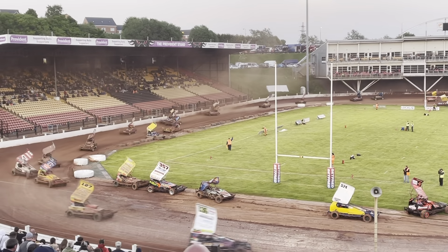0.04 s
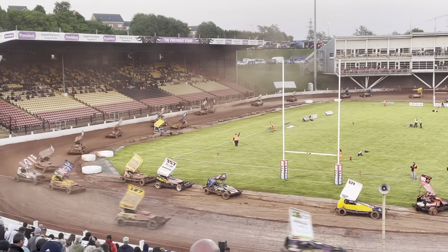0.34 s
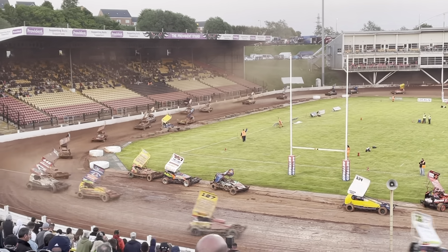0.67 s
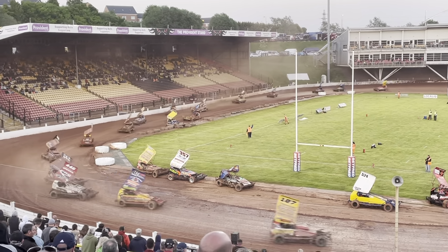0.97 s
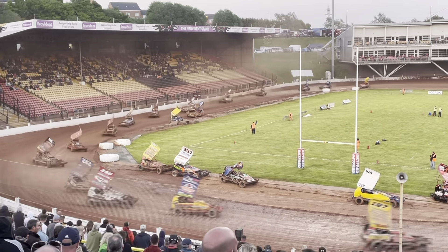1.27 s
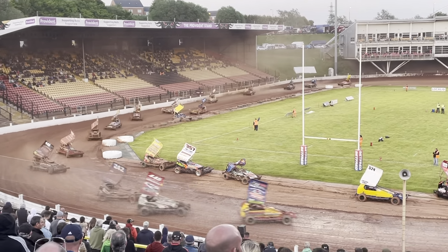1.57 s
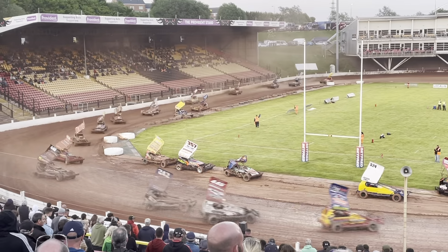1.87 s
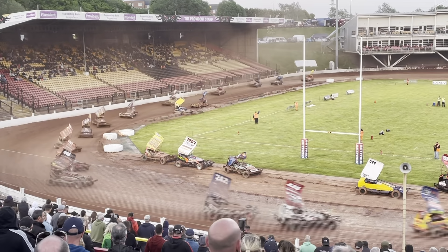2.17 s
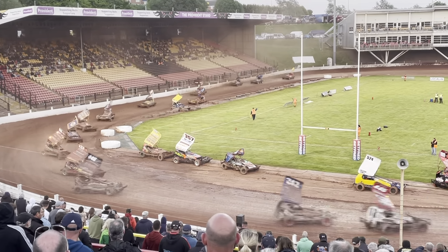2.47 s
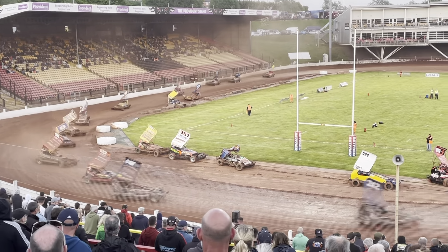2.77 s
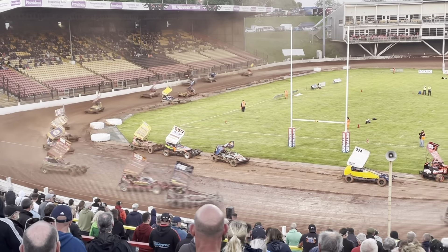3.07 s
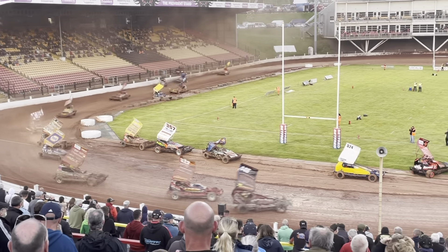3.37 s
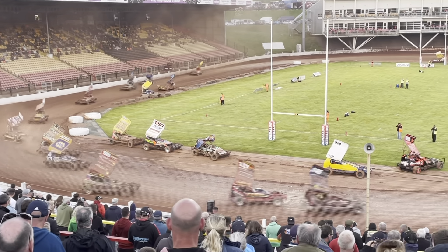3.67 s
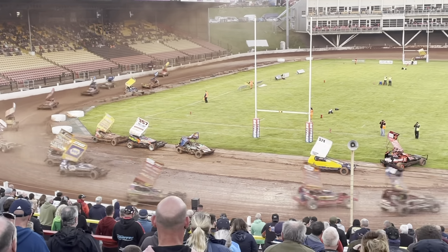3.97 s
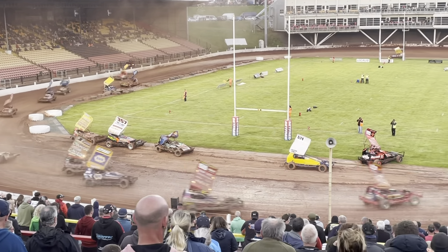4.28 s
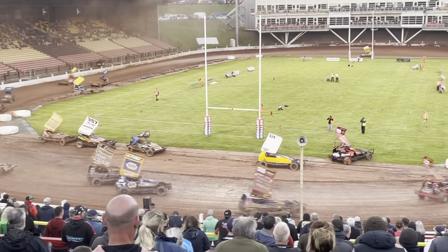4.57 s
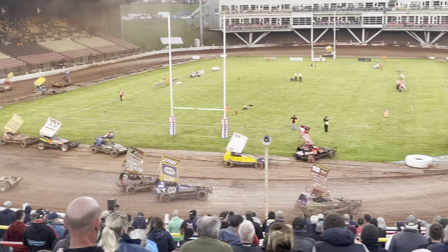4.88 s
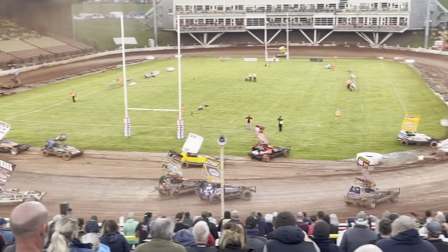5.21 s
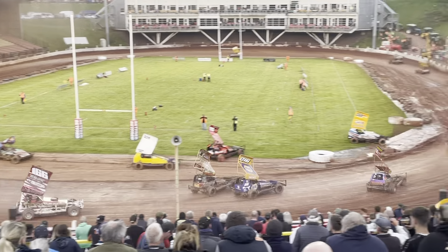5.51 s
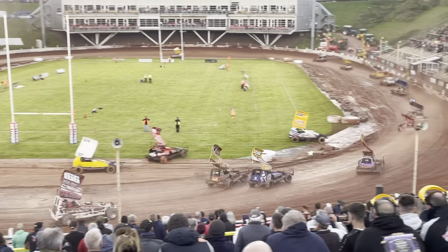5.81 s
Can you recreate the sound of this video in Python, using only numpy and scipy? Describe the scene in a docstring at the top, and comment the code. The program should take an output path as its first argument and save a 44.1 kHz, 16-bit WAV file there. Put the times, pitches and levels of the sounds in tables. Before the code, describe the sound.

A field of open-piped V8 stock cars races on a dirt oval, heard from high in a stadium's stands. Their rumbling, rasping roar lasts all six seconds, echoes off the terraces and grows somewhat louder from about 2 seconds. At first a near engine booms with a deep, lumpy throb, barking harder around 1.7 seconds. Another revs up sharply at 2.2 seconds and again near 2.8. More cars accelerate past, overlapping, from 3.3 to 5.2 seconds, and a last one barks around 5.6 and at the end. Farther engines rise and fall in pitch behind them. Faint tyre scrapes and thin squeals come in the first 1.3 seconds and again near 5.3. Flung grit hisses lightly, with small, bright stone cracks around 0.8 to 1.6 seconds and 5.3. One soft, low gust buffets the microphone at about 5.4 seconds.

```python
"""A dirt oval, high in the stands: open-piped V8 stock cars power out of a bend.
Each engine's unevenly firing banks bark through the exhaust and boom when the revs meet the pipe's
resonance; a few near cars stand out of the pack. Gas rasps at every firing, tyres scrape and fling
grit, one gust buffets the microphone, and the stadium throws the sound back."""
import sys
import numpy as np
from scipy import signal
from scipy.fft import rfft, irfft
from scipy.io import wavfile
from scipy.ndimage import map_coordinates

SR = 44100
rng = np.random.default_rng(int(sys.argv[2]) if len(sys.argv) > 2 else 0)


def file_out(sig):
    """Save sig as 16-bit WAV at sys.argv[1]."""
    # one column per channel
    cols = np.atleast_2d(sig).T
    # limit, then scale
    lim = np.clip(cols, -1, 1)
    pcm = np.round(lim * 32767).astype(np.int16)
    wavfile.write(sys.argv[1], SR, pcm)


N = 266805
T = np.arange(N) / SR

# spectrum of flung shale (frequency [Hz], gain [dB])
SHALE_SPECTRUM = [(3000, 1), (7000, 3), (10000, 15.5), (11500, 2.5), (13000, 9.5), (14300, -4),
                  (15500, -30)]


def near_cars(fade_s=.082, wheelspin=.005, flutter_db=1.5, waver_db=-.7, wet_db=-11):
    """Exhausts boom near cycle harmonic 3, growl near 5, bark at the firing rate and blare above."""
    # one curve per engine line (time [s], engine cycle rate [Hz], bark level [dB])
    opening_line = [(0, 34, -31), (.17, 31.6, -31), (.3, 33.5, -31), (.5, 37.7, -35), (.68, 35.5, -25.5),
                    (.8, 35.3, -26.5), (.95, 35.4, -33), (1.15, 32.8, -31), (1.3, 32.2, -30.5),
                    (1.44, 33.9, -25), (1.56, 33.7, -31), (1.7, 35.2, -19), (1.77, 34.7, -26),
                    (1.83, 36.9, -20.5), (1.92, 36.5, -24.5), (2.02, 38.4, -23), (2.12, 39.5, -38),
                    (2.55, 38, -37), (2.92, 38.3, -34), (3.12, 40.4, -32), (3.3, 37, -42)]
    line_b = [(2.1, 33, -20), (2.15, 34, -17.5), (2.21, 36.4, -13.8), (2.26, 39, -14), (2.31, 40.8, -19.5),
              (2.38, 41, -34), (2.6, 42, -26), (2.78, 44.7, -20), (2.88, 44.5, -30), (3.05, 46, -38)]
    line_c = [(2.8, 27.01, -42), (3.3, 31.55, -31), (3.5, 36, -37), (3.66, 35.7, -27), (3.85, 41, -28),
              (3.97, 43.6, -24.5), (4.07, 43, -24), (4.17, 43, -31), (4.27, 44.2, -22), (4.4, 43.5, -42),
              (4.52, 42, -21), (4.67, 44.4, -24), (4.73, 43.2, -25), (4.82, 42.56, -18),
              (4.93, 43.52, -23.5), (5.05, 45.37, -20), (5.2, 45.3, -28.5), (5.5, 45.98, -35)]
    line_d = [(3.35, 42.96, -29), (3.45, 43.52, -18.5), (3.6, 45.5, -25.5), (3.8, 49.37, -25),
              (3.95, 49.13, -32), (4.15, 46, -44), (4.5, 47, -26.5)]
    line_e = [(4.1, 29.98, -25), (4.27, 28.67, -27.5), (4.88, 30, -33), (5.2, 32.55, -26.5),
              (5.45, 34.46, -37), (5.57, 36.17, -20), (5.68, 35.43, -29), (5.85, 33.5, -33),
              (6.05, 36.07, -21.5)]
    # (curve, boom at resonance [dB], throb [dB], growl [dB], far bank in the bark [dB], blare [dB])
    exhausts = [(opening_line, -16.5, 1, -26, -9.5, -39.5),
                (line_b, -22.5, 3.9, -37, -2, -34.5),
                (line_c, -21.5, 3.2, -36, -4.5, -36.5),
                (line_d, -28, 3, -37, -6, -34.5),
                (line_e, -25.5, 4.35, -32, -8, -40)]
    # (frequency [Hz], gain [dB])
    boom_spectrum = [(30, -50), (60, -22), (85, 0), (125, 0), (160, -20), (250, -42), (500, -60),
                     (4000, -110)]
    growl_spectrum = [(60, -34), (110, -35), (150, 5), (235, 0.5), (280, -12.5), (400, -46.5), (800, -73),
                      (4000, -100)]
    bark_spectrum = [(100, -55.5), (190, -12), (260, 6), (370, 2.5), (450, 4), (620, -18.5), (1200, -22),
                     (2500, -24), (6000, -48.5), (12000, -84)]
    blare_spectrum = [(250, -35.5), (480, -7.5), (750, 2), (1300, -7.5), (2400, -10.5), (3500, -17),
                      (6000, -39.5)]
    # a pipe swings towards the stand and rings
    # (time [s], half length [s], frequency [Hz], width [Hz], glide [octaves/s], level [dB])
    flares = [(0.442, .08, 1240, 600, 0, -36.5), (.545, 0.014, 1690, 1400, 0, -37),
              (0.879, 0.14, 1960, 520, .7, -35.5), (1.282, .07, 1880, 260, 0.35, -38.5),
              (1.197, 0.1, 946, 90, -0.115, -33.5), (1.199, 0.2, 640, 140, 0, -31),
              (1.697, 0.023, 3000, 500, -0.1, -40), (2.223, 0.046, 1300, 1400, -0.1, -38),
              (2.734, 0.083, 753.4, 300, 0.28, -30), (3.097, 0.05, 820.4, 130, -0, -30.5),
              (3.117, .09, 505, 120, -0.11, -23), (3.808, 0.18, 444, 90, 0.09, -21.5),
              (3.914, 0.14, 850, 130, 0.35, -26.5), (4.012, 0.099, 2310, 350, 0.17, -36),
              (4.101, 0.18, 2995, 1100, 0.4, -39), (4.126, 0.049, 1600, 300, -0.13, -34),
              (4.143, 0.057, 518, 130, 0, -29), (4.33, 0.058, 1150, 600, .2, -35),
              (5.28, 0.036, 2000, 2400, 0, -36.5)]
    # the opening boom of several passing cars dips briefly between them (time [s])
    dips = [.67, 1.15, 1.62, 3.05]
    dip_db = -27 * sum(swell(at_s, half_s=.028) for at_s in dips)
    booms = barks = blares = drive = 0
    for line, boom_db, throb_db, growl_db, far_bank_db, blare_db in exhausts:
        cycle_hz, bark_db = curves(line)
        present = np.clip(np.minimum(T - line[0][0], line[-1][0] - T) / fade_s + 1, 0, 1)
        revs_hz = cycle_hz * (1 + wheelspin * walk(14))
        lumps = firings(revs_hz, far_bank_db=-24.5, scatter_db=1.3, jitter_s=.00005)
        pulses = firings(revs_hz, far_bank_db, scatter_db=1.3, jitter_s=.00005)
        lumps, pulses = lumps - lumps.mean(), pulses - pulses.mean()
        boom = band(lumps, boom_spectrum, boom_db + throb_db * walk(14)) * boom_gain(cycle_hz)
        growl = band(lumps, growl_spectrum, growl_db + waver_db * walk(6.9))
        bark = band(pulses, bark_spectrum, bark_db + flutter_db * walk(30))
        booms += present * boom * (amp(dip_db) if line is opening_line else 1)
        barks += present * (growl + bark)
        blares += present * band(lumps, blare_spectrum, blare_db)
        drive += present * lumps
    upper = barks + blares + sum(ring(drive, *flare) for flare in flares)
    return booms + upper + amp(wet_db) * echoes(upper, t60_s=2.4, gap_s=.055)


def firings(cycle_hz, far_bank_db, scatter_db, jitter_s, cylinder_db=1.85, count=4096):
    """Eight exhaust pulses a cycle; the far bank is shaded, so the beat is lumpy."""
    near_bank = np.array([1, 0, 0, 1, 0, 1, 1, 0])  # cross-plane V8: 1 leaves by the near pipe
    firing = np.arange(count)
    timing, strength = np.clip(rng.standard_normal((count, 2)), -1.5, 1.5).T
    pattern_db = far_bank_db * (1 - near_bank) + cylinder_db * rng.standard_normal(8)
    fired = np.cumsum(cycle_hz) * 8 / SR + rng.random()
    at_sample = np.interp(firing, fired, np.arange(N), left=-N, right=2 * N) + jitter_s * SR * timing
    push = amp(pattern_db[firing % 8] + scatter_db * strength)
    live = (at_sample >= 0) & (at_sample < N - 1)
    index, fraction, push = at_sample[live].astype(int), at_sample[live] % 1, push[live]
    return np.bincount(index, push * (1 - fraction), N) + np.bincount(index + 1, push * fraction, N)


def boom_gain(cycle_hz, peak_cycle_hz=34.4, width_hz=9.5):
    """The boom is strongest when the revs sit on the pipe's resonance."""
    return 1 / (1 + (2 * (cycle_hz - peak_cycle_hz) / width_hz) ** 2)


def pack(puff_s=.0016, wash_db=-1):
    """The field's exhaust pulses rumble, drone and roar; gas puffs after each; the bowl smears them."""
    # before trim (time [s], rumble [dB], drone [dB], roar [dB])
    exhaust_levels = [(0.02, -30, -22.5, -24.5), (.6, -27, -20.5, -23), (0.95, -30, -22, -23.5),
                      (1.5, -27.5, -22.5, -22), (1.9, -26, -21, -17.5), (2.25, -26, -21.5, -19),
                      (2.59, -26.5, -18.5, -17.5), (3.1, -26.5, -25.5, -18.5), (3.75, -22.5, -21.5, -17.5),
                      (4.13, -23.5, -22, -18), (4.33, -21, -19.5, -19), (4.41, -23.5, -17.5, -16.5),
                      (4.92, -20.5, -20.5, -18.5), (5.39, -31, -19.5, -18), (5.7, -23.5, -18.5, -18.5),
                      (5.9, -32, -20, -17.5)]
    # gas and tyres, before trim (time [s], rasp [dB], hiss [dB])
    gas_levels = [(0.02, -23.5, -36), (0.12, -25.5, -45.5), (.3, -28, -38.5), (0.53, -25, -40.5),
                  (0.67, -31, -42), (1.15, -26, -39.5), (1.45, -29.5, -42), (1.62, -26, -40),
                  (1.98, -27.5, -40), (2.17, -27.5, -39), (3.65, -26.5, -39), (3.92, -25.5, -40),
                  (4.18, -27, -37.5), (5.03, -31, -40), (5.2, -25, -37.5), (5.23, -24.5, -37),
                  (5.32, -24.5, -37), (5.43, -32.5, -40.5), (5.65, -25, -41.5), (5.92, -28, -40.5),
                  (6.0, -26, -37)]
    # (frequency [Hz], gain [dB])
    rumble_spectrum = [(20, -46), (45, -11), (58, 4), (75, 9.5), (95, 12.5), (125, 1), (170, -20.5),
                       (300, -62.5), (3000, -100)]
    drone_spectrum = [(60, -52), (120, -7), (170, 4.5), (235, 3.5), (290, -4.5), (400, -46.5),
                      (1000, -65.5)]
    roar_spectrum = [(120, -27), (200, -20), (270, 0), (340, 3.5), (460, -0.5), (620, -10), (850, -12.5),
                     (1400, -21), (2500, -27.5), (6000, -52), (12000, -93)]
    rasp_spectrum = [(300, -3.5), (750, 3), (1000, 1), (1400, 0.5), (2000, -5.5), (3000, -14.5),
                     (6000, -35.5)]
    hiss_spectrum = [(1000, -7.5), (2200, -1), (3200, -1.5), (4500, -7.5), (5500, -9.5), (6700, -12.5),
                     (8000, -9), (9500, -38), (11000, -20), (15000, -36)]
    rumble_db, drone_db, roar_db = curves(exhaust_levels)
    rasp_db, hiss_db = curves(gas_levels)
    pulses = pack_firings()
    gas = unit(signal.lfilter([1], [1, -np.exp(-1 / (puff_s * SR))], np.abs(pulses)))
    puffs = np.hypot(gas, amp(wash_db)) * rng.standard_normal(N)  # over an even wash of reflections
    smeared = pulses + echoes(pulses, t60_s=1.88, gap_s=.02)
    rumble = band(smeared, rumble_spectrum, rumble_db, trim_db=5)
    drone = band(smeared, drone_spectrum, drone_db, trim_db=-1)
    roar = band(smeared, roar_spectrum, roar_db, trim_db=-1)
    rasp = band(puffs, rasp_spectrum, rasp_db, trim_db=-1.5)
    hiss = band(puffs, hiss_spectrum, hiss_db + .5 * walk(35), trim_db=3)
    return rumble + drone + roar + rasp + hiss


def pack_firings(cars=30, base_cycle_hz=37, pickup_per_s=.14, swing=.06, half_s=1.0, low_cut_hz=35):
    """One car after another swings out of the bend, gaining revs while it is heard."""
    gearing = np.resize([.78, 1.1, .92, 1.22, 1, .85, 1.16], cars)
    pulses = 0
    for pass_s, gear in zip(np.linspace(-1, T[-1] + 1, cars), gearing):
        age_s = T - pass_s
        cycle_hz = base_cycle_hz * gear * np.exp(pickup_per_s * np.clip(age_s, -2, 2) + swing * walk(4))
        present = np.exp(-.5 * (age_s / half_s) ** 2)
        pulses += present * firings(cycle_hz, far_bank_db=-18.5, scatter_db=3.5, jitter_s=.00013)
    low_cut = signal.butter(4, low_cut_hz, "high", fs=SR, output="sos")
    return signal.sosfilt(low_cut, pulses - pulses.mean())


def engine_notes(octave_db=-14, wobble=.011, flutter_db=2.4):
    """A farther car's strongest exhaust harmonic and its octave glide with the revs, shaken by ruts."""
    # (time [s], half length [s], frequency [Hz], glide [octaves/s], level [dB])
    notes = [(0.1, 0.27, 218.3, -0.17, -25.5), (.58, .13, 182, 0.12, -33),
             (0.658, 0.068, 204.9, -0.86, -25.5), (1.051, .17, 177.6, 0.023, -26.5),
             (1.449, .11, 368, .15, -27), (1.618, 0.066, 259, -.7, -22.5), (1.879, 0.074, 376, 0.2, -27.5),
             (1.922, 0.1, 203.1, -0.15, -22.5), (2.17, 0.049, 419.9, 0, -24),
             (2.451, 0.18, 379, -0.017, -27.5), (2.42, 0.0601, 254, 1.7, -17.5),
             (2.832, 0.11, 240.6, -0.38, -26), (2.97, .07, 184.6, 0.67, -22), (3.451, .2, 189.7, .3, -24),
             (3.521, 0.091, 286, -.1, -26), (4.1, .16, 222, 0.21, -23), (4.72, .16, 306, .2, -25),
             (2.698, 0.0784, 349.6, .45, -25), (5.098, 0.13, 322, -0.35, -22),
             (5.152, 0.097, 134.4, 0.64, -21.5), (5.151, 0.13, 217, .4, -22),
             (5.35, 0.043, 167.7, -0.13, -19), (5.68, .08, 70.3, -1.94, -19),
             (5.819, 0.16, 246, -0.44, -22.5)]
    out = np.zeros(N)
    for at_s, half_s, hz, glide, db in notes:
        span = np.abs(T - at_s) < 4 * half_s
        age_s = np.clip(T[span] - at_s, -2 * half_s, 2 * half_s)
        note_hz = hz * np.exp2(glide * age_s) * (1 + wobble * walk(40)[span])
        phase = 2 * np.pi * (np.cumsum(note_hz) / SR + rng.random())
        tone = unit(np.sin(phase) + amp(octave_db) * np.sin(2 * phase))
        out[span] += tone * swell(at_s, half_s)[span] * amp(db + flutter_db * walk(35)[span])
    return out


def skids():
    """Sliding tyres scrape in a broad band or squeal thinly in a narrow one."""
    # (time [s], half length [s], frequency [Hz], width [Hz], glide [octaves/s], level [dB])
    slides = [(.063, .05, 2200, 300, .18, -40), (.5, .035, 3200, 1800, 0, -37),
              (.97, .11, 2250, 260, .2, -39.5), (1.01, .07, 3380, 450, .6, -44),
              (1.275, .055, 1395, 35, .1, -34), (5.228, .011, 3200, 4000, 0, -35.5),
              (5.285, .04, 3600, 3500, 0, -39)]
    friction = rng.standard_normal(N)
    return sum(ring(friction, *slide) for slide in slides)


def grit(grains_per_s=6000, spread_db=3, clump_db=1.5, wash_db=-3):
    """Shale flung from the tyres: clumps of tiny grains over a fine wash, thicker in each spray."""
    # whole field, before trim (time [s], level [dB])
    steady_levels = [(0, -44), (.15, -75), (.33, -56), (.55, -49), (.66, -58), (1.1, -56), (2.1, -53.5),
                     (5.1, -52), (5.85, -60), (6.05, -54)]
    # from sliding cars, before trim (time [s], half length [s], level [dB])
    sprays = [(0.26, .03, -47.5), (0.86, 0.027, -50), (1.194, 0.015, -50), (1.558, .03, -56),
              (1.68, 0.025, -52), (2.147, 0.039, -48), (5.285, .05, -48), (5.389, .015, -49)]
    steady_db, = curves(steady_levels)
    spray_power = sum((amp(db) * swell(at_s, half_s)) ** 2 for at_s, half_s, db in sprays)
    flow = np.sqrt(amp(steady_db) ** 2 + spray_power)
    hits = (rng.random(N) < grains_per_s / SR) * rng.standard_normal(N)
    grains = unit(hits * amp(spread_db * np.minimum(rng.exponential(size=N), 4)))
    wash = amp(wash_db) * rng.standard_normal(N)
    return flow * band(grains + wash, SHALE_SPECTRUM, clump_db * walk(86), trim_db=4)


def stones(decay_s=.0007):
    """Larger stones strike with a short, bright crack."""
    # before trim (time [s], level [dB])
    strikes = [(0.815, -38), (0.8435, -32), (0.8704, -28.5), (1.1942, -34), (1.4651, -33), (1.5524, -29),
               (1.5808, -34), (5.218, -36), (5.2744, -35), (5.2859, -28), (5.3834, -35)]
    envelope = sum(amp(db) * (T >= at_s) * np.exp(-np.abs(T - at_s) / decay_s) for at_s, db in strikes)
    return envelope * band(rng.standard_normal(N), SHALE_SPECTRUM, trim_db=4)


def wind(at_s=5.36, half_s=.13, level_db=-29):
    """One soft gust buffets the microphone."""
    buffet = unit(resonate(rng.standard_normal(N), hz=42, width_hz=30))
    return buffet * swell(at_s, half_s) * amp(level_db)


def echoes(x, t60_s, gap_s):
    """Dense reflections from terraces and roofs, already ringing at the start."""
    t = T[:SR]
    response = rng.standard_normal(SR) * np.exp(-np.log(1000) * t / t60_s) * (t > gap_s)
    lead_in = np.concatenate([x[:SR][::-1], x])
    return signal.fftconvolve(lead_in, response / np.linalg.norm(response))[SR:SR + N]


def ring(drive, at_s, half_s, hz, width_hz, octaves_per_s, db):
    """A resonance that swells and fades, gliding together with the sound inside it."""
    span = np.abs(T - at_s) < 4 * half_s
    age_s, bell = T[span] - at_s, swell(at_s, half_s)[span]
    warped_s = np.cumsum(np.exp2(octaves_per_s * age_s)) / SR
    warped_s -= np.interp(0, age_s, warped_s)
    rung = np.interp(warped_s, age_s, resonate(drive[span], hz, width_hz))
    out = np.zeros(N)
    out[span] = rung * bell * amp(db) / np.sqrt(np.average(rung ** 2, weights=bell ** 2))
    return out


def resonate(x, hz, width_hz):
    """A resonance applied twice, for steep skirts."""
    b, a = signal.iirpeak(hz, hz / width_hz, fs=SR)
    return signal.lfilter(b, a, signal.lfilter(b, a, x))


def band(x, spectrum, level_db=0, trim_db=0):
    """Filter by a spectrum, then scale from rms 1 by level plus trim."""
    return unit(colour(x, spectrum)) * amp(level_db + trim_db)


def colour(x, spectrum, size=8192):
    """Causal filter through (frequency [Hz], gain [dB]) points, built from the cepstrum."""
    hz, db = np.transpose(spectrum)
    bin_hz = np.maximum(np.fft.rfftfreq(size, 1 / SR), 1)
    gain = amp(np.interp(np.log(bin_hz), np.log(hz), db))
    cepstrum = irfft(np.log(gain))
    cepstrum[1:size // 2] *= 2
    cepstrum[size // 2 + 1:] = 0
    return signal.oaconvolve(x, irfft(np.exp(rfft(cepstrum))))[:N]


def walk(rate_hz):
    """Smooth random drift with a spread near 1."""
    knots = rng.standard_normal(512)
    return map_coordinates(knots, [T[::64] * rate_hz + 1], order=3, mode="wrap").repeat(64)[:N]


def swell(at_s, half_s):
    """Gaussian bell, peak 1."""
    return np.exp(-.5 * np.minimum(np.abs(T - at_s) / half_s, 10) ** 2)


def curves(table):
    """A timed table's columns at every sample."""
    times_s, *columns = np.transpose(table)
    return [np.interp(T, times_s, column) for column in columns]


def amp(db):
    """Decibels to gain."""
    return np.exp(np.asarray(db) * np.log(10) / 20)


def unit(x):
    """Scale to rms 1."""
    return x / np.sqrt(np.mean(x ** 2))


def scene():
    """Engines and grit in front; reflections off the surrounding seats give the width."""
    # (frequency [Hz], gain [dB])
    side_spectrum = [(60, -34), (110, -25), (200, -14.5), (380, -17), (690, -5.5), (1280, -14),
                     (2370, -32.5), (4360, -8.5), (8000, -14.5), (11500, -21), (14000, -22)]
    mid = near_cars() + pack() + engine_notes() + skids() + grit() + stones() + wind()
    side = colour(echoes(mid, t60_s=.21, gap_s=.0046), side_spectrum)
    return np.array([mid + side, mid - side])


def record(dry):
    """Two microphone ports drift apart in phase through the treble; peaks are rounded, the top cut."""
    # (frequency [Hz], left lead [rad])
    port_phase = [(0, 0), (2500, 0), (3200, .4), (5200, .5), (5800, -1.6), (6800, -.6), (7600, -2.2),
                  (8400, -3.05), (9500, -3.25), (10000, -3.9), (12200, -5.6), (12600, -6.2), (15000, -6.3)]
    # (frequency [Hz], left minus right [dB])
    port_balance = [(110, -0.9), (200, -0.32), (350, -1.5), (690, 0.93), (1280, 0.81), (2370, -0.26)]
    ceiling, top_hz = .95, 14700
    bin_hz = np.fft.rfftfreq(N, 1 / SR)
    lead_rad = np.interp(bin_hz, *np.transpose(port_phase))
    pan_db = np.interp(bin_hz, *np.transpose(port_balance))
    split = np.array([[.5], [-.5]])
    heard = irfft(rfft(dry) * np.exp(1j * split * lead_rad) * amp(split * pan_db), N)
    rounded = heard / (1 + np.abs(heard / ceiling) ** 8) ** (1 / 8)
    return signal.sosfilt(signal.ellip(8, .2, 70, top_hz, fs=SR, output="sos"), rounded)


dry = scene()
out = record(dry)
file_out(out)
```